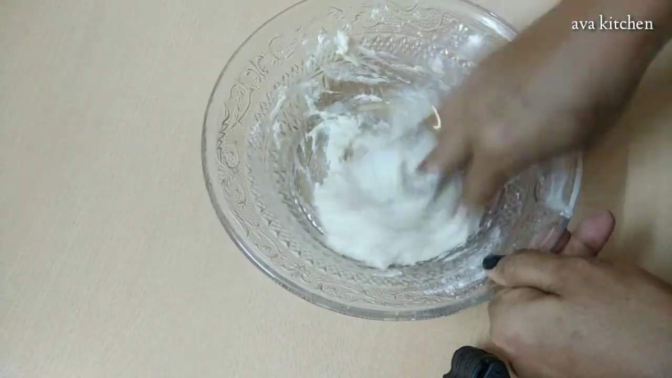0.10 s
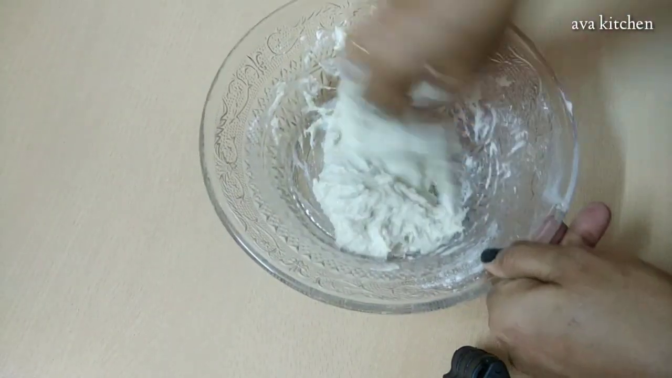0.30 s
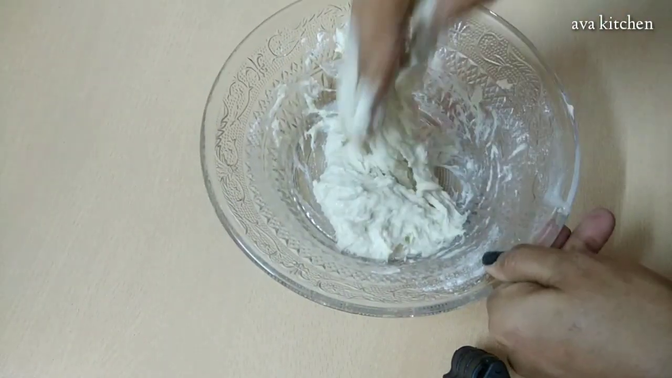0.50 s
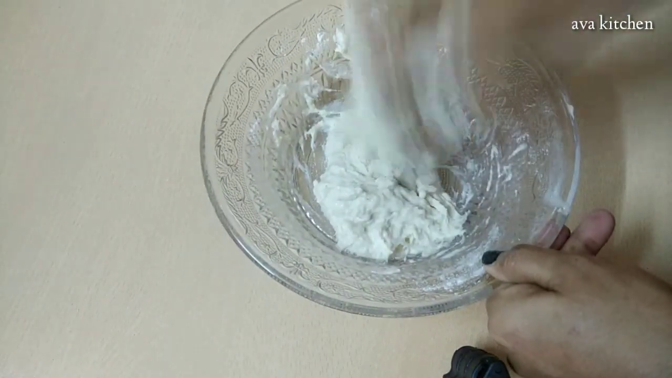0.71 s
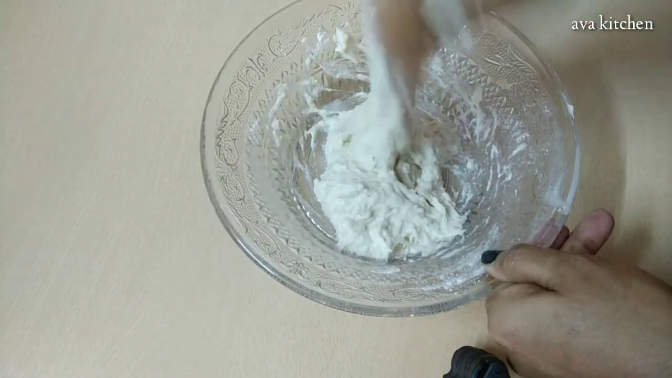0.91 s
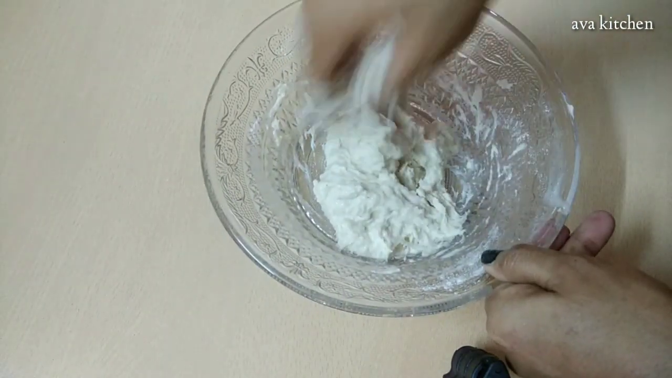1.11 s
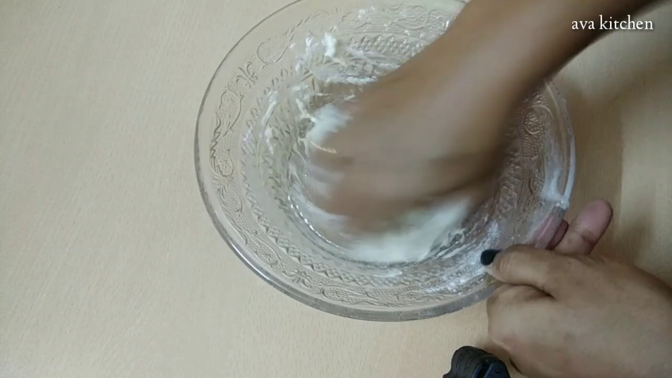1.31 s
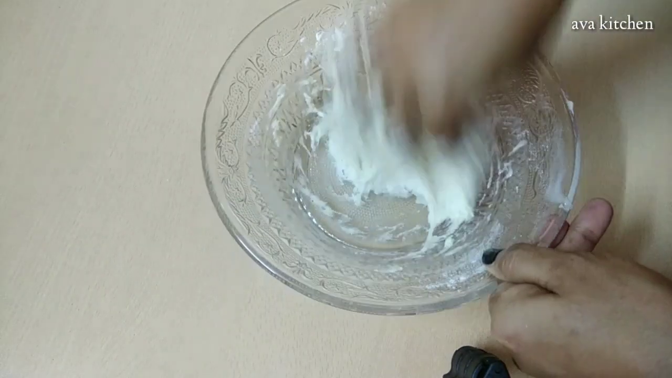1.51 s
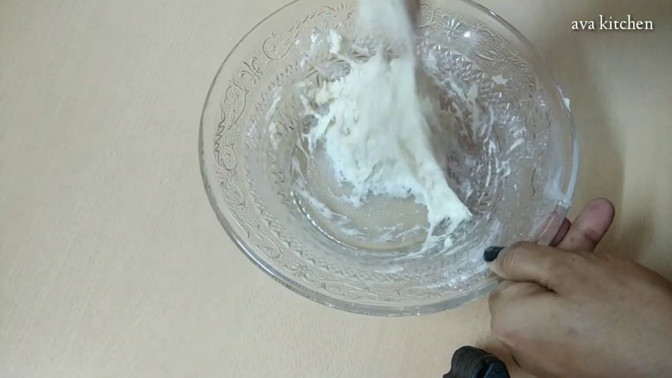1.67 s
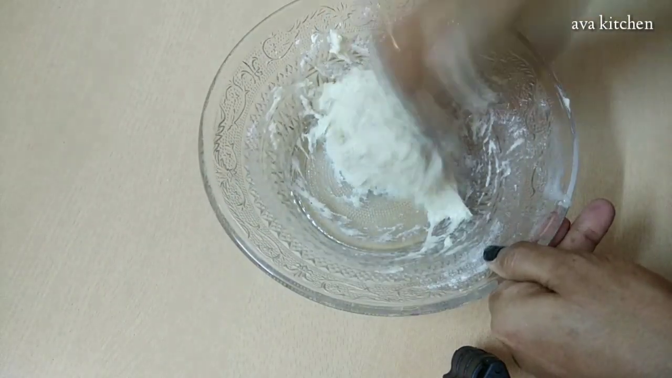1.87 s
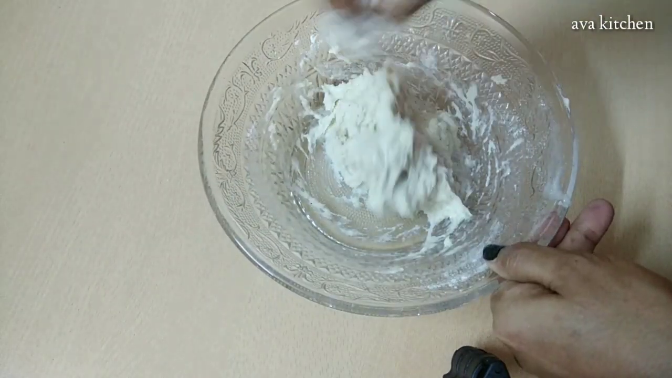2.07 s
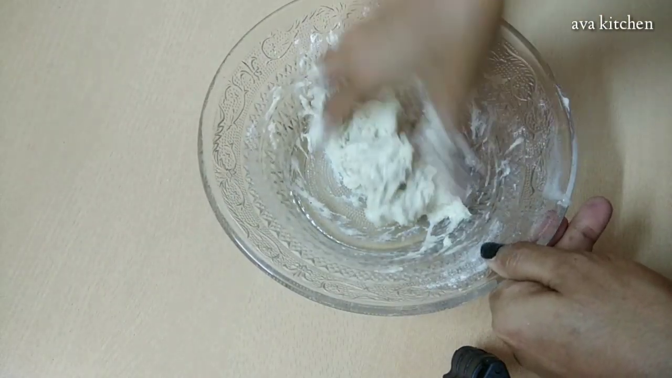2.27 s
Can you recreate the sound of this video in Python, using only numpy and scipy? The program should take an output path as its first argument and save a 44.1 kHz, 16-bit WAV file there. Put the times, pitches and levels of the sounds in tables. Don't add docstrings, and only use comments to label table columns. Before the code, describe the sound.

Glass bowl knocks on a wooden table while sticky batter is kneaded, close up in a lightly echoing kitchen. Faint scrape and sticky hiss at 0.05-0.2 s, loudest knock cluster at 0.22-0.3, wet pops at 0.4-0.75, a lull, rubbing and crackle from 1.06, knocks at 1.22-1.4, softer taps at 1.82, crisp pops from 2.08, tiny faint squeak near 2.35. Quiet background noise throughout.

```python
import sys
import numpy as np
from scipy import signal
from scipy.fft import rfft, irfft
from scipy.io import wavfile
from scipy.ndimage import uniform_filter1d

SR = 44100
rng = np.random.default_rng(int(sys.argv[2]) if len(sys.argv) > 2 else 0)


def gain_from_db(level_db):
    decades = np.asarray(level_db, float) / 20
    return 10 ** decades


def dump(signal):
    limited = np.clip(np.atleast_2d(signal).T, -1, 1)
    pcm = np.round(limited * 32767).astype(np.int16)
    wavfile.write(sys.argv[1], SR, pcm)


N = 105840
T = np.arange(N) / SR
LEFT_RIGHT = np.array([[1.0], [-1.0]])

# frequency in Hz, level in dB.
FLOOR_TONE = [(15, -59), (40, -31), (150, -14), (524, -9.5), (726, -21), (1430, -11), (2090, -19.5),
              (2330, -12.5), (16500, -72)]
# frequency in Hz, level in dB, T60 in s.
ROOM_TONE = [(149, -26.5, 0.95), (285, 4, 0.58), (563, 4.5, 0.29), (968, 11.5, 0.38), (1724, 19, 0.25),
             (2630, 11.5, 0.54)]
# time in seconds, level in dB.
PRESS_LEVEL = [(0.0, -55.5), (0.2, -38.5), (0.23, -32), (0.27, -35.5), (0.34, -28), (0.56, -48.5),
               (0.66, -47.5), (0.89, -64), (1.1, -46), (1.3, -40.5), (1.35, -47.5), (1.41, -38.5),
               (1.66, -58), (1.86, -43), (2.06, -58), (2.14, -43.5), (2.37, -61), (2.4, -53)]
# frequency in Hz, bandwidth in Hz, level in dB.
LOAD_MODES = [(40, 19, -18), (68, 12, -36), (122.4, 3.2, -1.5), (165.35, 3.7, 2.5), (224, 20, -3.5)]
# frequency in Hz, level in dB, T60 in s.
TABLE_MODES = [(248.4, -3, 0.34), (330.5, -14, 0.6), (415.5, -8.5, .4), (495, -8, 0.29), (541, -13, 0.19),
               (738, -10.5, 0.18), (816, -0.5, 0.18), (926, -12, 0.064), (930, -32, 0.28),
               (1027, -3.5, .25), (1199, 1, 0.23), (1474, -16.5, 0.17)]
# time in seconds, pitch in Hz, level in dB.
SQUEAK = [
    (2.3, 400, -70),
    (2.325, 450, -60.5),
    (2.35, 549, -54),
    (2.38, 430, -55),
    (2.4, 437, -92),
]
# time in seconds, level in dB.
PEEL_LEVEL = [(0, -39.5), (.1, -42.5), (.4, -47.5), (.55, -50.5), (.6, -42.5), (.75, -46), (.85, -61),
              (1.0, -62), (1.08, -43), (1.22, -39), (1.45, -50), (1.67, -58), (1.7, -45), (1.88, -47.5),
              (1.97, -60), (2.06, -59), (2.09, -39.5), (2.4, -49)]
# frequency in Hz, level in dB.
PEEL_TONE = [(1470, -14), (2500, -10), (3370, -9), (7150, -8), (10700, 1.5), (14900, -0.5), (16000, -4.5),
             (16500, -72)]
# start in seconds, level in dB, centre in Hz, left over right in dB.
POPS = [(0.0188, -49, 11800, 48), (0.0522, -32.5, 12560, 21), (0.195, -33, 11460, 13.5),
        (0.2978, -36, 9750, -6), (0.4248, -29, 15000, 6.5), (0.4661, -32.5, 10700, -1),
        (0.561, -48, 13100, 14), (0.5749, -24, 10410, -4), (0.59, -21.5, 12930, -6),
        (0.5933, -26, 11740, 2.5), (0.6731, -32.5, 11240, 2), (0.708, -33, 13000, 1.5),
        (0.7261, -25.5, 14400, 2), (0.7508, -28.5, 11800, 0.5), (1.015, -41.5, 11500, 8),
        (1.067, -39, 9600, -5.5), (1.1635, -37.5, 9440, -18), (1.1806, -28.5, 9070, -5.5),
        (1.1956, -22.5, 10800, -1.5), (1.228, -21.5, 12100, 1), (1.6151, -42, 14900, 18.5),
        (1.6836, -31, 11000, 11), (1.687, -20.5, 14430, -3.5), (1.7598, -46, 11000, -5.5),
        (1.8678, -33, 11900, -1), (2.0762, -17.5, 12950, -4.5), (2.1485, -20.5, 9000, 5.5),
        (2.1811, -27, 12170, 5.0), (2.3519, -32, 9230, -8.5), (2.3822, -27, 10800, -10.5),
        (2.0763, -22, 8040, -2), (2.0756, -31, 1510, 4), (2.15, -27.5, 6060, 5.5), (2.1773, -32, 12950, 2),
        (2.353, -37, 4900, -5), (1.689, -35.5, 1380, 0), (1.691, -29, 11960, 0.5), (1.787, -37, 11000, 2),
        (1.796, -32, 11100, -0.5), (2.097, -35, 11800, 4), (0.59, -32.5, 4950, 0), (0.011, -34, 6860, 0),
        (1.181, -36.5, 5000, 0.5), (1.231, -31, 4800, -4)]
# time in seconds, level in dB.
DRAG_LEVEL = [(0, -51), (.05, -55), (.07, -37.5), (.16, -42.5), (.21, -43.5), (.55, -51), (.6, -56),
              (.75, -60.5), (.85, -76), (1.02, -71), (1.07, -41), (1.165, -36.5), (1.19, -48.5),
              (1.23, -39.5), (1.66, -55), (1.75, -54), (2.1, -56), (2.4, -65.5)]
# frequency in Hz, level in dB.
DRAG_TONE = [(110, -42.5), (190, 6), (221, -2.5), (367, -10), (393, -7), (843, -9), (1150, -18),
             (3000, -33), (3900, -64), (6600, -120)]
# time in seconds, level in dB.
RUB_LEVEL = [(0, -75), (.045, -63), (.07, -48), (.12, -47), (.19, -69), (.23, -81), (1.03, -82.5),
             (1.06, -51.5), (1.08, -43), (1.1, -43), (1.13, -38), (1.15, -40.5), (1.175, -50), (1.2, -56),
             (1.23, -77), (2.4, -88)]
# frequency in Hz, level in dB, T60 in s.
RUB_MODES = [(350, -0.5, .05), (600, -2.5, 0.035), (770, -2.5, .04), (893, -2.5, 0.058), (1040, -7, 0.047),
             (1294, -12.5, .04)]
# frequency in Hz, level in dB, share of the ring time.
BOWL_MODES = [(317.6, 6.5, 0.55), (663, -4.5, 0.78), (863, 0, 1.1), (1040, -24.5, 0.77), (1232, -19.5, 1),
              (2250, -39.5, 3)]
# start in seconds, level in dB, contact in ms, ring T60 in s.
KNOCKS = [(0.2194, -1, 0.5, 0.15), (.2442, -2.5, 0.55, 0.014), (.2570, -15, 0.39, 0.078),
          (0.271, -7, 0.66, 0.051), (0.301, -26.5, 0.69, .05), (1.2240, -7, 0.49, 0.033),
          (1.2495, -14, 0.47, 0.058), (1.2820, -15, 0.64, 0.058), (1.3847, -11, 0.53, 0.047),
          (1.400, -22.5, 0.54, 0.011), (1.8202, -17.5, 0.54, 0.031), (1.8323, -21.5, 0.69, 0.035),
          (.054, -34, 0.66, 0.025), (1.823, -21, 0.79, 0.026), (1.8362, -23, 0.54, 0.017),
          (1.8401, -25.5, 0.6, 0.033), (1.156, -28.5, 0.8, 0.12), (0.576, -39, 0.45, 0.053)]


def unit(x):
    return x / np.sqrt(np.mean(x ** 2))


def colour(x, tone):
    tone = np.array(tone)
    log_hz = np.log(np.arange(N // 2 + 1) * SR / N + 1)
    return irfft(rfft(x) * gain_from_db(np.interp(log_hz, np.log(tone[:, 0]), tone[:, 1])), N)


def curve(table, axis=1):
    points = np.array(table)
    return np.interp(T, points[:, 0], points[:, axis])


def walk(rate):
    k = int(SR / rate)
    return unit(uniform_filter1d(uniform_filter1d(rng.standard_normal(N), k), k))


def ring(x, hz, t60):
    pole = np.exp((2j * np.pi * hz - np.log(1000) / t60) / SR)
    return signal.lfilter([1], [1, -pole], x + 0j)


def wide(hz_split):
    mid, side = rng.standard_normal((2, N))
    side = signal.lfilter(*signal.butter(1, hz_split, "high", fs=SR), side)
    return np.array([mid + side, mid - side])


def quiet_floor():
    return unit(colour(wide(500), FLOOR_TONE) * gain_from_db(walk(6.1))) * gain_from_db(-60.5)


def room(pushes):
    level_db, width_share = 4, 0.78
    tone, tail, t = np.array(ROOM_TONE), 0, T[:SR]
    log_tone_hz = np.log(tone[:, 0])
    for hz in 90 * 2 ** np.arange(0, 6, .5):
        db = np.interp(np.log(hz), log_tone_hz, tone[:, 1])
        t60 = np.interp(np.log(hz), log_tone_hz, tone[:, 2])
        band = signal.butter(2, [hz / 1.19, hz * 1.19], "band", fs=SR, output="sos")
        mid, side = signal.sosfilt(band, rng.standard_normal((2, SR)))
        share = np.clip(width_share * hz / 600, 0, 1)
        tail = tail + gain_from_db(db - 60 * t / t60) * np.array([mid + share * side, mid - share * side]) / np.sqrt(hz)
    tail = tail * (1 - np.exp(-t / .008)) * gain_from_db(level_db)
    return signal.fftconvolve(tail, pushes[None], axes=1)[:, :N] * 6


def load():
    out = 0
    for hz, width, db in LOAD_MODES:
        force = np.gradient(wide(820), axis=1)
        out = out + gain_from_db(db) * unit(ring(force, hz, 2.2 / width).imag)
    return unit(out) * gain_from_db(curve(PRESS_LEVEL))


def table(pushes):
    out = 0
    for k, (hz, db, t60) in enumerate(TABLE_MODES):
        out = out + gain_from_db(db + LEFT_RIGHT * np.cos(1.9 * k)) * ring(pushes, hz, t60).imag
    return gain_from_db(-14.5) * out


def squeak():
    phase = 2 * np.pi * np.cumsum(curve(SQUEAK)) / SR
    return gain_from_db(curve(SQUEAK, axis=2)) * (T > SQUEAK[0][0]) * np.sin(phase)


def peel():
    crackles_per_s, spread_db, fade_s = 220, -0.5, 0.0024
    grains = (rng.random(N) < crackles_per_s / SR) * gain_from_db(spread_db * rng.exponential(size=N))
    swell = 1 + .5 * signal.lfilter([1], [1, -np.exp(-1 / (fade_s * SR))], grains)
    hiss = colour(wide(1500) * swell * gain_from_db(1.94 * walk(45)), PEEL_TONE)
    return unit(hiss) * gain_from_db(curve(PEEL_LEVEL) - 2.5)


def pops():
    burst_s, tail_s, tail_db, low_db = .0005, .007, -22, -25
    out, t = np.zeros((2, N)), T[:SR // 10]
    u = t - .003
    fall = np.exp(-u / burst_s) + gain_from_db(tail_db) * np.exp(-u / tail_s)
    env = np.where(u < 0, np.exp(u / burst_s), fall)
    for s, db, hz, pan_db in POPS:
        noise = rng.standard_normal((2, len(t)))
        tone = 0.5 * np.cos(2 * np.pi * hz * u) * (u < 4 * burst_s)
        band = signal.butter(1, [hz * 0.82, min(hz * 1.18, 19000)], "band", fs=SR)
        pop = signal.lfilter(*band, (noise + tone) * env) + gain_from_db(low_db) * noise * env
        i = int((s - .002) * SR)
        n = min(len(t), N - i)
        out[:, i:i + n] += (gain_from_db(db + 2.5 + LEFT_RIGHT * pan_db / 2) * pop)[:, :n]
    return out


def slap(pushes):
    hz, level_db, t60 = 2200, -13.5, 0.15
    env = signal.lfilter([1], [1, -gain_from_db(-60 / t60 / SR)], np.abs(np.gradient(pushes)))
    band = signal.butter(1, [hz / 1.4, hz * 0.88], "band", fs=SR)
    return gain_from_db(level_db) * env * unit(signal.lfilter(*band, wide(1500)))


def drag():
    return unit(colour(wide(900) * gain_from_db(3.7 * walk(50)), DRAG_TONE)) * gain_from_db(curve(DRAG_LEVEL))


def rub():
    slips_per_s = 350
    out = 0
    for hz, db, t60 in RUB_MODES:
        slips = (rng.random(N) < slips_per_s / SR) * wide(1400)
        out = out + gain_from_db(db) * unit(ring(slips, hz, t60).imag)
    return unit(out) * gain_from_db(curve(RUB_LEVEL))


def knocks():
    rebound_ms, rebound_db, bowl_db, bowl_top_hz = 2.698, -13.5, -8, 1300
    bowl, pushes, t = np.zeros(N), np.zeros(N), T[:SR // 4]
    for s, db, ms, ring_s in KNOCKS:
        i = int(s * SR)
        u = (t - (s - i / SR) - .001) / (ms / 1000)
        rebound = gain_from_db(rebound_db) * np.exp(-(u - rebound_ms / ms) ** 2 * 2)
        push = gain_from_db(db) * (np.exp(-u ** 2 * 2) + rebound) / (ms * SR / 1000)
        jolt = np.gradient(np.gradient(push))
        n = min(len(t), N - i)
        pushes[i:i + n] += push[:n]
        for hz, mode_db, share in BOWL_MODES:
            mode = ring(jolt, hz, ring_s * share).real * (SR / (2 * np.pi * hz)) ** 2
            bowl[i:i + n] -= gain_from_db(mode_db) * mode[:n]
    return gain_from_db(bowl_db) * signal.lfilter(*signal.butter(3, bowl_top_hz, fs=SR), bowl), pushes


def scene():
    bowl, pushes = knocks()
    radiated = signal.lfilter(*signal.butter(3, 198.6, "high", fs=SR), pushes)
    impacts = room(radiated) + table(radiated) + slap(pushes) + bowl * gain_from_db(LEFT_RIGHT)
    return quiet_floor() + load() + squeak() + peel() + pops() + drag() + rub() + impacts


def roll_off(x):
    return signal.sosfilt(signal.butter(12, 16650, fs=SR, output="sos"), x)


def record(dry):
    left_port_db, top_hz, bass_cut_hz = 4.5, 15500, 55
    left, right = [colour(x, [(9000, 0), (13000, side * left_port_db / 2)]) for x, side in zip(dry, (1, -1))]
    rounded = np.tanh(np.array([left, right]) / 1.37) * 1.146
    x = signal.sosfilt(signal.ellip(6, .3, 24, top_hz, fs=SR, output="sos"), rounded)
    x = signal.lfilter(*signal.butter(2, bass_cut_hz, "high", fs=SR), x)
    return roll_off(x)


dry = scene()
out = record(dry)
dump(out)
```